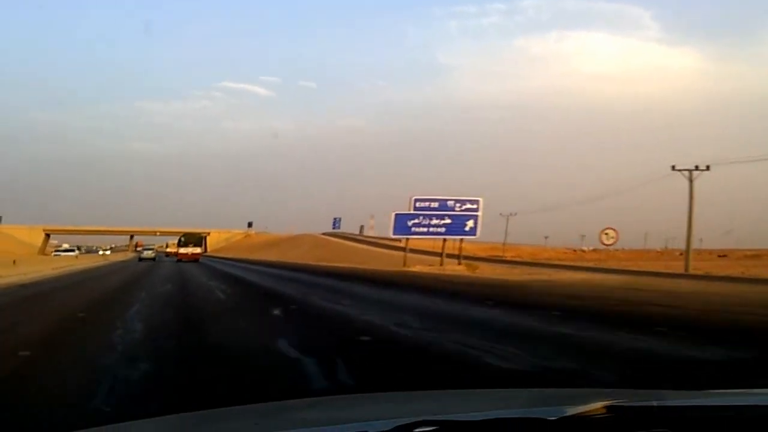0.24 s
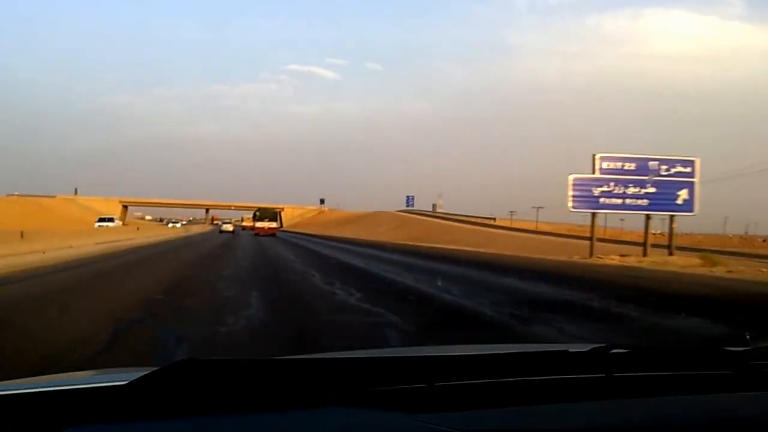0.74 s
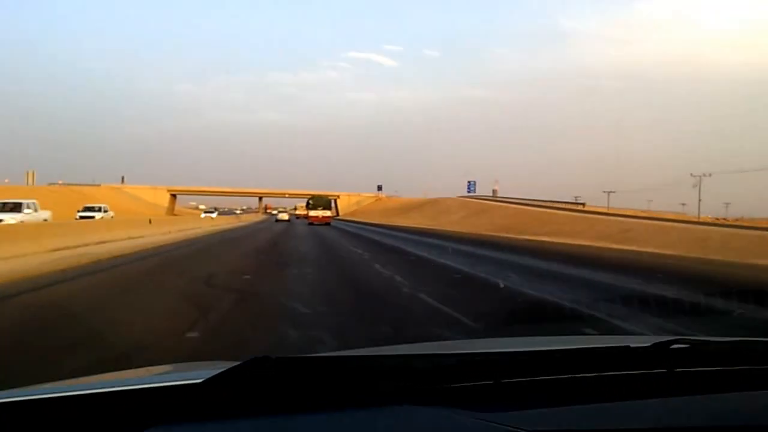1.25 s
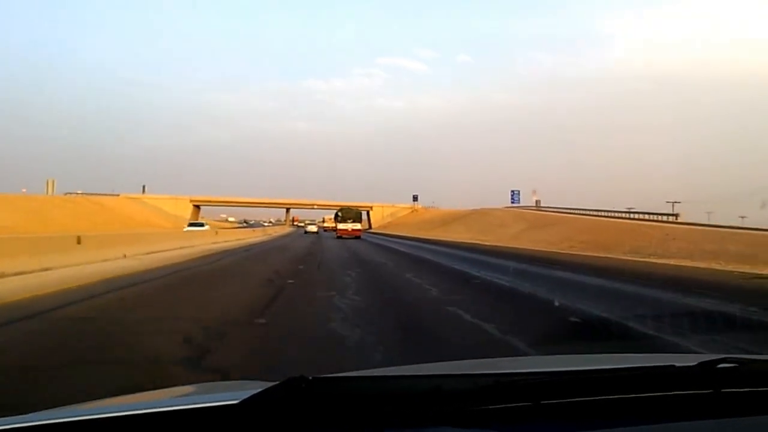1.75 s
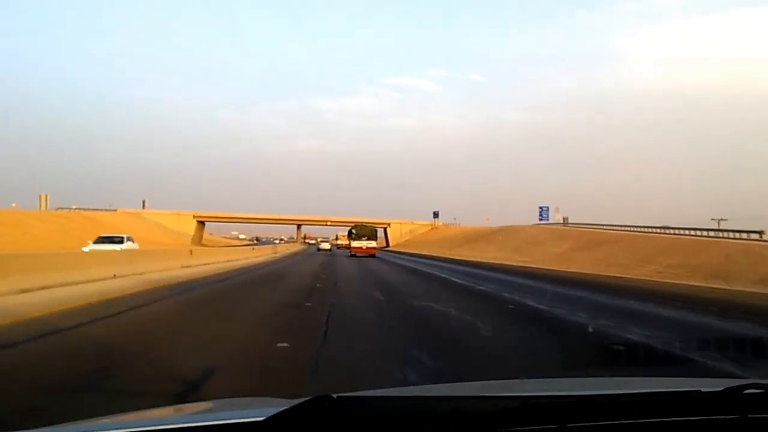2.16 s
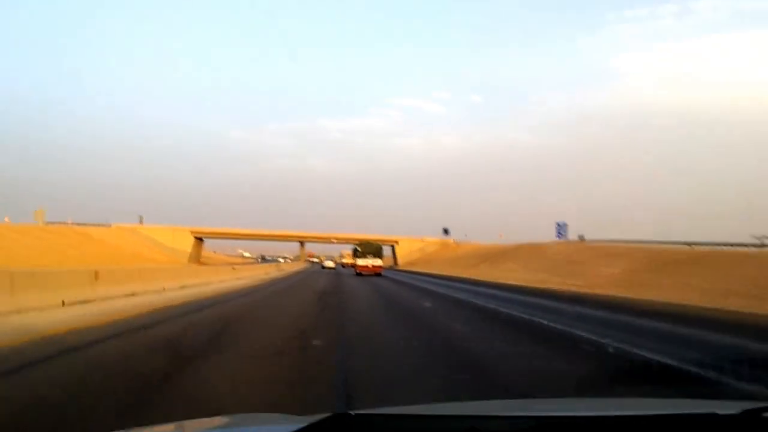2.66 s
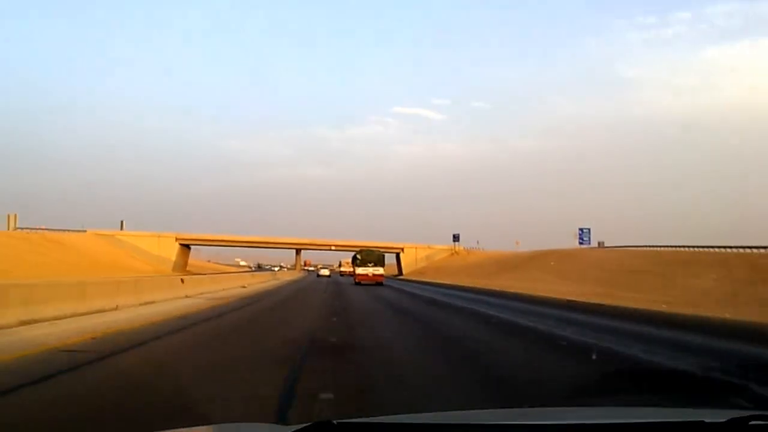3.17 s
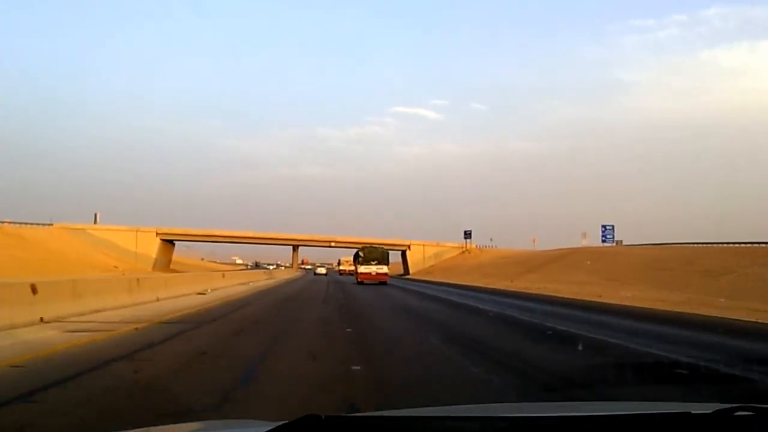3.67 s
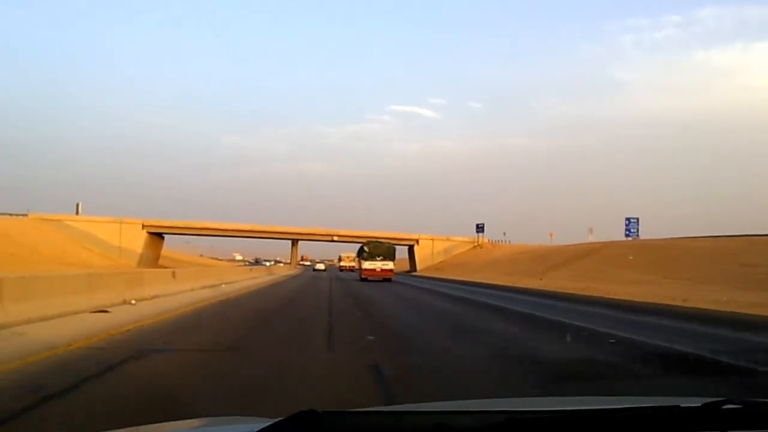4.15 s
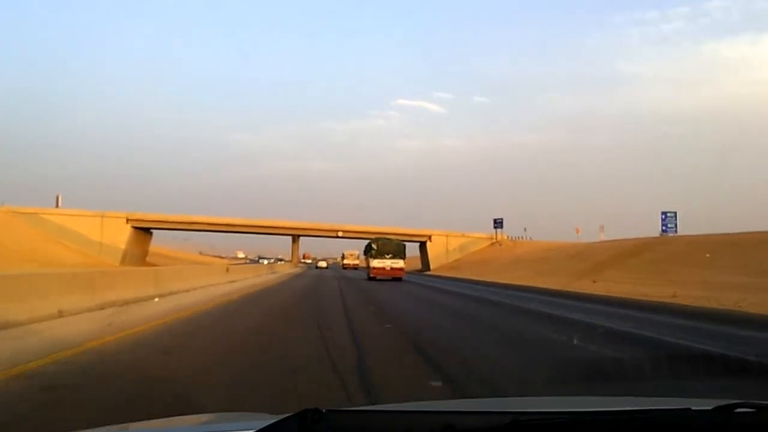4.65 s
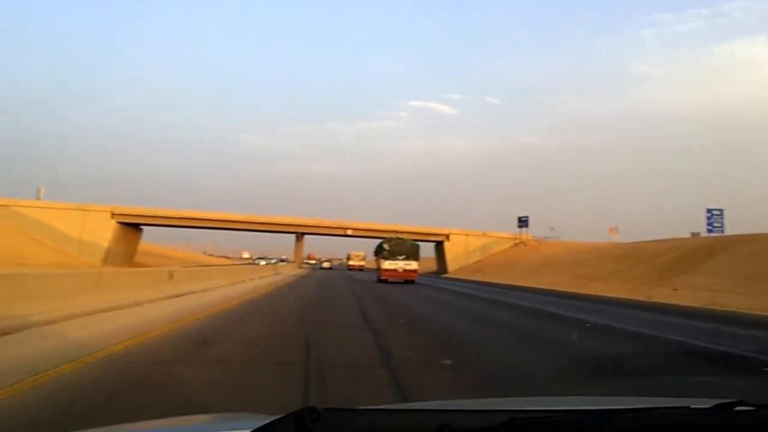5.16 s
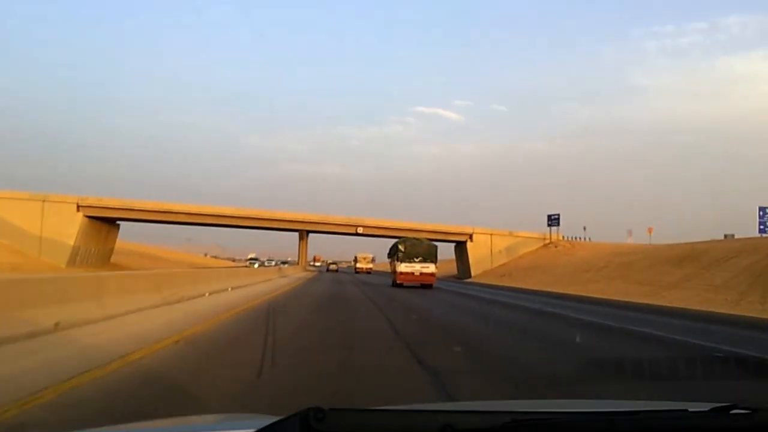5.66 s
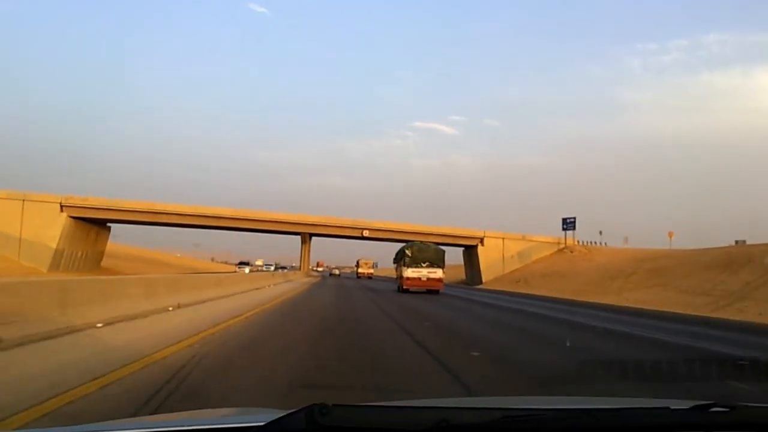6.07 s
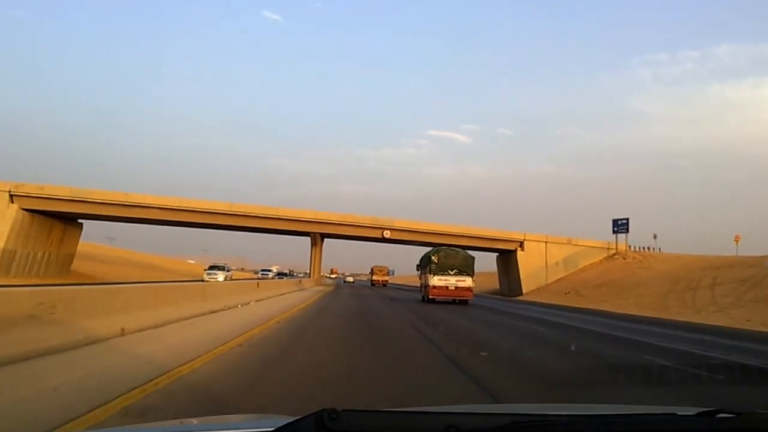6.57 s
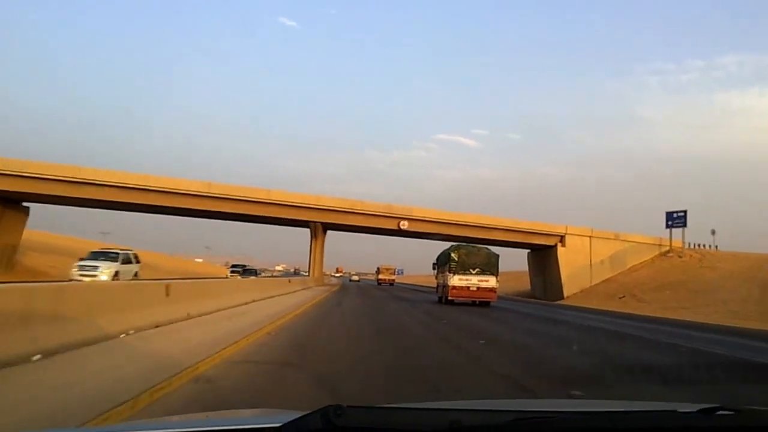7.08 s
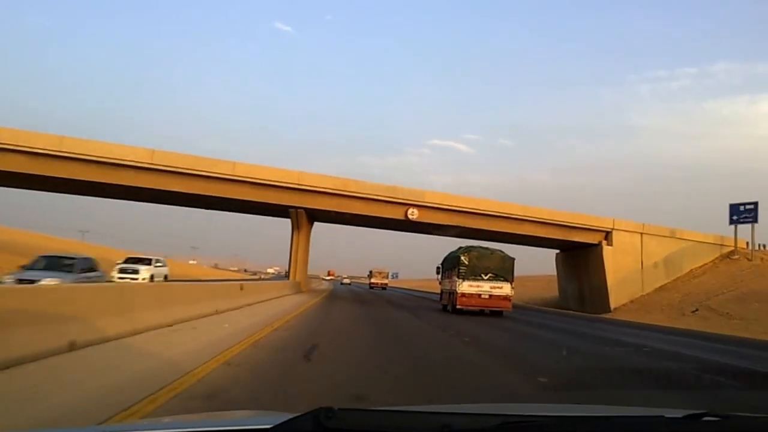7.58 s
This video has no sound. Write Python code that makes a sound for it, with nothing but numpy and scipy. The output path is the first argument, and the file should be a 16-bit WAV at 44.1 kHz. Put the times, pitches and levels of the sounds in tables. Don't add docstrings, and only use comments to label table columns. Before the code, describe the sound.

From 0 s, a car cabin at steady highway speed: dense low rumble and boom, muffled tyre roar above it, and a thin high hiss almost entirely on the left. A tiny metal trinket at the left tinkles very fast and faintly, about sixteen touches a second with irregular stronger ones. Small plastic ticks appear, with a lone crack near 0.6 s. The bass swells slightly around 1.5 s. At about 2.7-3.3 s a rough patch brings a run of heavy low thuds, knocking panels, slaps, cracks and grainy creaks, the loudest blows distorting the close microphone. The drone settles, with light snaps at 4-5 s. A second jolt begins softly at 5.1 s, hits hard at 5.2-5.3 s and ends with smaller thumps near 5.5 s alongside a bright snap. Until about 7.8 s, steady rumble, with livelier light tinkling around 6.5 s.

```python
import sys
import numpy as np
from scipy import signal
from scipy.fft import rfft, irfft
from scipy.io import wavfile
from scipy.ndimage import uniform_filter1d

SR = 44100
rng = np.random.default_rng(int(sys.argv[2]) if len(sys.argv) > 2 else 0)


def gain_from_decibels(decibels):
    exponent = np.asarray(decibels, float) / 20
    return 10 ** exponent


def master(y):
    cut = np.clip(np.atleast_2d(y).T, -1, 1)
    pcm = np.round(cut * 32767)
    wavfile.write(sys.argv[1], SR, pcm.astype(np.int16))


N = 344862


def at_hz(points, hz):
    curve_hz, value = np.array(points)[:, 0], np.array(points)[:, 1]
    return np.interp(np.log(hz), np.log(curve_hz), value)


def clicks(rows, gains):
    out = np.full(N, 1e-18)
    at = (np.array(rows)[:, 0] * SR).astype(int)
    np.add.at(out, np.minimum(at, N - 1), gains)
    return out


def ring(x, hz, t60):
    radius, w = gain_from_decibels(-60 / (t60 * SR)), 2 * np.pi * hz / SR
    return signal.lfilter([0, np.sin(w)], [1, -2 * radius * np.cos(w), radius ** 2], x)


def bandpass(x, order, low_hz, high_hz):
    return signal.sosfilt(signal.butter(order, [low_hz, high_hz], "band", fs=SR, output="sos"), x)


def ticks(rows, low_hz, high_hz, gain_db):
    puff = np.zeros(N)
    for s, db, t60 in rows:
        t = np.arange(int(t60 * SR)) / SR
        at = int(s * SR)
        puff[at:at + len(t)] += gain_from_decibels(db + gain_db - 60 * t / t60)
    return bandpass(puff * rng.standard_normal(N), 2, low_hz, high_hz)


def after_shake(rows, t60):
    rise_s = 0.005
    fade, rise = gain_from_decibels(-120 / (t60 * SR)), np.exp(-1 / (rise_s * SR))
    power = signal.lfilter([1], [1, -fade], clicks(rows, gain_from_decibels(2 * np.array(rows)[:, 1])))
    return signal.lfilter([1 - rise], [1, -rise], power)


# t/s, level/dB
SURFACE = [(0, 1), (.4, 1), (1.4, 0.8), (2.6, -0.5), (3.7, 0), (4.8, -1), (6.2, -0.5), (7.0, -0.2),
           (7.82, -0.2)]
# t/s, level/dB
ROAD_WAVES = [(.0, -25.5), (.12, -20), (.36, -19.5), (.7, -21), (1.08, -19.5), (1.32, -17), (1.56, -15.5),
              (1.7, -22), (1.97, -21), (2.46, -21), (3.75, -21), (3.93, -22), (4.44, -21), (4.6, -21),
              (4.7, -20.5), (5.04, -27), (5.82, -24), (6.06, -25), (6.42, -18.5), (6.62, -25), (6.78, -25),
              (7.14, -21.5), (7.5, -19)]
# steady level/dB, share of surface swing [1], after-shake level re the blows/dB, t60/s
REGIONS = [
    (-26, .2, -13.5, 0.48),
    (-24, 0.33, -13.5, 0.4),
    (-23.5, .3, -8.5, 0.61),
    (-33, 0.63, -13, 0.53),
    (-48, 1.7, -10.5, 0.53),
]


def ride():
    t = np.arange(N) / SR
    surface_db = np.interp(t, *np.transpose(SURFACE))
    power = []
    for (db, share, shake_db, t60), blows in zip(REGIONS, [JOLTS, JOLTS, KNOCKS, SLAPS, CREAKS]):
        steady = gain_from_decibels(2 * (db + share * surface_db))
        power.append(steady + gain_from_decibels(2 * shake_db) * after_shake(blows, t60))
    wave_s = .07
    power[1] += sum(gain_from_decibels(2 * db) * np.exp(-((t - s) / wave_s) ** 2) for s, db in ROAD_WAVES)
    return 10 * np.log10(power)


# f/Hz, lag/rad
LEFT_LAG = [(25, 0.12), (100, 0.21), (200, 0.4), (700, 0.51), (880, 0.81), (1000, 2.14), (1900, 3.77),
            (2300, 5.56)]
# f/Hz, level/dB
LEFT_LEAN = [(60, 6.5), (110, 3.5), (200, 2.5), (380, 1.0), (700, 1), (1290, -1.5), (2380, 0.5), (4390, -7),
             (8110, 3), (15000, 16)]


def at_ports(spectrum, hz, alike):
    envelope = uniform_filter1d(np.abs(spectrum), size=400)
    private = rfft(rng.standard_normal(N)) * envelope / np.sqrt(N)
    lean = gain_from_decibels(at_hz(LEFT_LEAN, hz) / 2)
    left = alike * spectrum + np.sqrt(1 - alike ** 2) * private
    left = left * np.exp(-1j * at_hz(LEFT_LAG, hz))
    return np.array([left * lean, spectrum / lean])


# f/Hz, spectral level/dB
ROAD_SPECTRUM = [(12, -33), (20, 3.5), (98, 1), (171, -5.5), (227, -9), (264, -12), (308, -8.5), (681, -22),
                 (794, -22.5), (925, -24.5), (1140, -24.5), (1580, -29.5), (1990, -34), (3080, -49.5),
                 (9000, -62), (11700, -91), (19800, -120)]
# f/Hz, width/Hz, level above the broad noise/dB
CABIN_MODES = [(27.5, 8.7, 10.5), (45.45, 2.6, 15), (81, 15, 8), (108.2, 5.6, 11), (146, 34, 2),
               (218.6, 8.9, 5.5), (233.4, 27, 3.5), (304, 31, 3), (307.7, 2.7, -5.5), (430, 105, 3),
               (799, 28, 5), (1115, 25, 6.5), (1340, 71, 3), (1950, 49, 1.5), (4980, 1500, 2.5)]
# f/Hz, coherence [1]
COHERENCE = [(60, 1), (130, 0.95), (200, 0.86), (300, 0.83), (450, 0.54), (650, 0.35), (850, 0.23),
             (1050, 0.042), (1600, 0.41), (2300, 0.083), (3500, 0.039)]


def road(levels):
    hz = np.maximum(np.fft.rfftfreq(N, 1 / SR), 1)
    modes_db = sum(db / (1 + (2 * (hz - mode_hz) / width_hz) ** 2) for mode_hz, width_hz, db in CABIN_MODES)
    colour = gain_from_decibels(at_hz(ROAD_SPECTRUM, hz) + modes_db) / np.sqrt(1 + (25 / hz) ** 6)
    alike = np.clip(at_hz(COHERENCE, hz), 0, 1)
    ports = at_ports(colour * rfft(rng.standard_normal(N)), hz, alike)
    edges_hz = [1e-3, 60, 140, 600, 2500, 1e5]
    below = [1 / (1 + (hz / edge) ** 8) for edge in edges_hz]
    evened = [0.55, 0.55, 0.15, 0.14, 0.16]
    out = 0
    for k, level_db in enumerate(levels):
        band = irfft(ports * (below[k + 1] - below[k]), N)
        power = uniform_filter1d(band.mean(0) ** 2, size=3500)
        swell = np.sqrt(uniform_filter1d(power, size=3500))
        band = band / swell ** evened[k]
        out = out + gain_from_decibels(level_db) * band / np.sqrt(np.mean(band.mean(0) ** 2))
    return out


# f/Hz, spectral level/dB
SEAL_AIR = [(8000, -14.5), (10000, 2.5), (12000, -4.5), (13000, -4.5), (14700, -11)]


def seal_hiss(hiss_db):
    hz = np.maximum(np.fft.rfftfreq(N, 1 / SR), 1)
    colour = gain_from_decibels(at_hz(SEAL_AIR, hz)) / (1 + (8000 / hz) ** 6)
    air = irfft(colour * rfft(rng.standard_normal((2, N))), N)
    air[1] = np.diff(air[1], n=2, prepend=[0, 0]) * 0.24
    shaken_db = np.maximum(hiss_db + 47.5, 0)
    return gain_from_decibels(-53 + shaken_db) * air / air[0].std()


# t/s, peak level/dB
HARD_TOUCHES = [(.0194, -36), (.3915, -38), (.5057, -33), (.5716, -36), (.8944, -34), (.9582, -33),
                (1.3418, -32), (1.6102, -38), (2.5122, -44), (3.0864, -37), (3.2201, -35), (3.3463, -32),
                (3.8546, -40), (4.3026, -34), (4.4897, -35), (4.8758, -33), (5.001, -31), (5.1223, -29),
                (5.3722, -30), (5.5029, -33), (5.5613, -35), (5.8716, -30), (6.3525, -35), (6.4168, -32),
                (6.7286, -36), (6.8503, -36), (7.1023, -36), (7.1621, -37), (7.4031, -36), (7.7757, -38)]
FIRM_TOUCHES = [.0787, .1321, .2563, .3107, .6345, .817, 1.072, 1.2166, 1.4027, 1.5284, 1.6571, 2.7651,
                2.9053, 3.0116, 3.2834, 4.0327, 4.1739, 4.6169, 4.7426, 5.239, 5.4355, 5.6136, 5.677,
                5.9254, 5.9823, 6.2926, 6.6049, 6.9721, 7.2784, 7.3407]
# t/s, level/dB
SWING = [(0, -45), (1.6, -45.5), (2.0, -46.5), (2.6, -46), (3.2, -44), (3.6, -45.5), (4.6, -44),
         (5.8, -47.5), (6.5, -39.5), (7.82, -42.5)]
MISSED_TURNS = [2.84, 3.91, 4.81, 5.06, 5.29]


def touches():
    turn_s, jitter_s, firm_db = .0635, .004, -38.5
    hard_s, hard_db = np.transpose(sorted(HARD_TOUCHES + [(s, firm_db) for s in FIRM_TOUCHES]))
    hard_turns = np.cumsum(np.round(np.diff(hard_s, prepend=hard_s[0]) / turn_s))
    turn = np.arange(hard_turns[-1] + 1)
    chance = np.clip(rng.standard_normal((len(turn), 3)), -2, 2)
    is_light = ~np.isin(turn, hard_turns)
    s = np.interp(turn, hard_turns, hard_s) + jitter_s * chance[:, 0] * is_light
    peak_db = np.interp(s, *np.transpose(SWING)) + 2.5 * chance[:, 1]
    peak_db[hard_turns.astype(int)] = hard_db
    upper_db = -8 + 2 * chance[:, 2]
    struck = np.abs(s[:, None] - MISSED_TURNS).min(axis=1) > turn_s / 2
    return np.transpose([s, peak_db, upper_db])[struck]


# f/Hz, level/dB, t60/s
TRINKET_MODES = [
    (9645, -1, .06),
    (9712, -2, .06),
    (10330, 0, .065),
    (10392, -4, .055),
    (10980, -9, .025),
    (11350, -8, .025),
    (12500, -17, .015),
    (13200, -19, .012),
    (7500, -16, .015),
]


def trinket_ring(tinkles):
    s, peak_db, upper_db = np.transpose(tinkles)
    upper = np.clip(gain_from_decibels(upper_db + 5), .1, .95)
    contacts = [(-.002, -6.5), (.001, -6.5), (.004, -11), (.008, -26), (.014, -24)]   # (wait/s, level/dB)
    chance = rng.standard_normal((len(s), len(TRINKET_MODES), len(contacts)))
    waits = rng.random((len(s), len(contacts)))
    out = 0
    for k, (hz, db, t60) in enumerate(TRINKET_MODES):
        share = np.sqrt(1 - upper ** 2) if k < 2 else upper if k < 4 else .9
        hits = 0
        for j, (wait, drop_db) in enumerate(contacts):
            contact_s = s + wait + 0.0016 * waits[:, j]
            hits = hits + clicks(contact_s[:, None], share * gain_from_decibels(peak_db + db + drop_db) * chance[:, k, j])
        out = out + bandpass(ring(hits, hz, t60), 1, hz - 800, hz + 800)
    loudest = np.array([np.abs(out[int(a * SR) - 90:int(a * SR) + 900]).max() for a in s])
    latest = np.maximum(np.searchsorted(s - .003, np.arange(N) / SR) - 1, 0)
    steady = (gain_from_decibels(peak_db - 2.5) / loudest)[latest]
    return out * steady


def trinket():
    tinkles = touches()
    contact = [(s - .001, db, .007) for s, db, _ in tinkles]
    metal = trinket_ring(tinkles) + ticks(contact, low_hz=9000, high_hz=14000, gain_db=-8.0)
    return np.array([metal * gain_from_decibels(8.0), np.roll(metal, 9) * gain_from_decibels(-11.5)])


# t/s, peak level/dB
SNAPS = [(0.3905, -47), (1.0221, -50), (1.1473, -50), (1.5274, -53), (2.6858, -46), (2.7087, -48),
         (2.7661, -45), (3.1837, -43), (3.2166, -40), (3.254, -43), (3.3443, -46), (4.0262, -44),
         (4.1101, -39), (4.4887, -40), (4.7242, -44), (4.8439, -47), (4.9227, -43), (5.0968, -44),
         (5.1218, -47), (5.239, -49), (5.4994, -32), (5.8706, -43.5), (6.2911, -46), (6.7266, -47),
         (7.0998, -48), (7.3392, -51), (7.5228, -45), (7.7732, -51.5)]


def snaps():
    rows = [(s, db, .005) for s, db in SNAPS]
    return ticks(rows, low_hz=7000, high_hz=15500, gain_db=9.5) * gain_from_decibels(np.array([[4], [-8]]))


# t/s, peak level/dB, lean to the left/dB (the right port is lowered by 2.5 times this)
CREAKS = [(0.6414, -44, -6), (2.6858, -44.5, -6), (2.7661, -33.5, -2.5), (2.808, -34, -3.5),
          (2.821, -37, 5), (2.968, -39, 0), (2.9845, -35.5, -3), (3.0086, -37, 2), (3.057, -32.5, 4),
          (3.094, -33, -3), (3.1394, -41, 3), (3.1844, -43, -4), (3.313, -40.5, -6.5), (5.1203, -56, -10),
          (5.223, -44, -4.0), (5.236, -38, -3), (5.25, -38, -5), (5.26, -31.5, -3.5), (5.286, -37, 2),
          (5.325, -32, 15), (5.364, -33.5, -4), (5.4234, -40, 3)]


def creaks():
    out = []
    for pan_share, top_hz in [(0.0, 12500), (-2.5, 5240)]:
        rows = []
        for s, db, pan in CREAKS:
            side_db = db + pan_share * pan
            rows += [(s, side_db - 3.0, 0.16), (s, side_db - 7, .02)]
        out.append(ticks(rows, low_hz=2000, high_hz=top_hz, gain_db=-0.5))
    return np.array(out)


# t/s, peak level/dB
CRACKS = [
    (.6414, -41),
    (2.6850, -32),
    (2.7661, -33),
    (2.807, -30),
    (2.9851, -38),
    (5.2614, -38),
    (5.3657, -38),
]


def brittle_cracks():
    rows = [(s, db, .014) for s, db in CRACKS]
    return ticks(rows, low_hz=2800, high_hz=6960, gain_db=2.0) * gain_from_decibels(np.array([[-3], [3]]))


# t/s, peak level/dB, t60/s
SLAPS = [(2.763, -19.5, 0.11), (2.953, -18.5, 0.045), (2.975, -23, 0.037), (3.053, -21, 0.099),
         (5.219, -20, 0.068), (5.24, -15, 0.096), (5.306, -32, 0.063), (5.325, -23, 0.06),
         (5.336, -27, 0.08), (5.422, -33, 0.06), (5.436, -35, 0.064)]


def slaps():
    opening = ticks([(s, db, .03) for s, db, _ in SLAPS], low_hz=550, high_hz=1500, gain_db=-3.0)
    return opening + ticks(SLAPS, low_hz=420, high_hz=1100, gain_db=11.5)


# t/s, peak level/dB, f/Hz, t60/s
KNOCKS = [(2.765, -14, 324, 0.094), (2.782, -12, 199, 0.1), (2.849, -11, 227, 0.054),
          (2.953, -7.5, 320, 0.083), (2.974, -6.5, 179, 0.12), (3.051, -6, 215, 0.11),
          (3.259, -15.5, 253, 0.13), (5.118, -16, 301, 0.13), (5.22, -7.5, 435, 0.13),
          (5.238, -7, 285, 0.098), (5.325, -4, 307, 0.071), (5.357, -34, 233, 0.14),
          (5.437, -13.5, 215, 0.075)]


def knocks():
    soft = signal.butter(2, 900, fs=SR, output="sos")
    rung = sum(ring(clicks([row], gain_from_decibels(row[1])), row[2], row[3]) for row in KNOCKS)
    return signal.sosfilt(soft, rung)


# t/s, peak level/dB, f/Hz, length/s
JOLTS = [(2.779, -8.5, 88.5, 0.024), (2.852, -10, 61, 0.022), (2.860, -12.5, 138, 0.042),
         (2.927, -8, 92, 0.048), (2.986, -3.5, 90.6, 0.025), (2.982, -10, 44.4, .06),
         (3.013, -13, 71, 0.015), (3.053, 2, 95.6, 0.043), (3.119, -6, 99.5, 0.061),
         (3.191, -11.5, 79, 0.055), (3.24, 0, 86.6, 0.028), (3.304, -12, 100.2, 0.076),
         (5.107, -15, 88, 0.02), (5.229, -2.5, 81, 0.18), (5.325, -1, 81, 0.016), (5.234, -12, 40.7, 0.082),
         (5.454, -13, 70, 0.022), (5.486, -6, 101.5, 0.024), (5.551, -3, 72, 0.011)]


def jolts():
    out = np.zeros(N)
    for s, db, hz, length in JOLTS:
        t = np.arange(int((length + .012) * SR)) / SR
        shape = np.clip(t / .005, 0, 1) * np.clip((t[-1] - t) / (.012 + .2 * length), 0, 1)
        at = int(s * SR)
        out[at:at + len(t)] += gain_from_decibels(db) * shape * np.sin(2 * np.pi * hz * t)
    return out


def scene():
    levels = ride()
    bed = road(levels) + seal_hiss(levels[4])
    trim = snaps() + creaks() + brittle_cracks()
    blows = slaps() + knocks() + jolts()
    body = np.array([np.roll(blows, 18) * gain_from_decibels(2.5), blows * gain_from_decibels(-1.2)])
    return bed + trinket() + trim + body


def starved_top(x):
    whole, all_hz = rfft(x), np.fft.rfftfreq(N, 1 / SR)
    low = irfft(whole * (all_hz < 4500), N)
    top = irfft(whole * (all_hz >= 4500) * (all_hz < 14750), N)
    hz, s, frames = signal.stft(top, SR, window="cosine", nperseg=2048, noverlap=1024)
    bright = uniform_filter1d(irfft(whole[0] * (all_hz > 9000), N) ** 2, size=256)
    sharp = np.flatnonzero(bright[300:] > gain_from_decibels(2 * 7.5) * bright[:-300]) / SR + .004
    near_sharp = np.abs(s[:, None] - sharp).min(axis=1) < .014
    spared = near_sharp | (rng.random(len(s)) < .1)
    faint = np.median(np.abs(frames[0, (hz > 12000) & (hz < 12600)]))
    tilt_db = 3.2 * (hz[:, None] - 12000) / 1000 * (hz[:, None] > 11000)
    step = faint * gain_from_decibels(tilt_db + 1.5 * rng.standard_normal(len(s)))
    threshold = np.where(spared, rng.uniform(.15, .6, len(s)), 1.45) * step
    dropped = (np.abs(frames) < threshold) & (rng.random(frames.shape) > .008)
    kept = signal.istft(frames * ~dropped, SR, window="cosine", nperseg=2048, noverlap=1024)[1]
    return low + kept[:, :N]


def roll_off(x):
    return signal.sosfilt(signal.butter(12, 15570, fs=SR, output="sos"), x)


def record(dry):
    low_pass = signal.cheby2(10, 50, 15600, fs=SR, output="sos")
    cut = signal.sosfilt(low_pass, starved_top(dry))
    return roll_off(np.clip(cut, -1, 1))


dry = scene()
out = record(dry)
master(out)
```